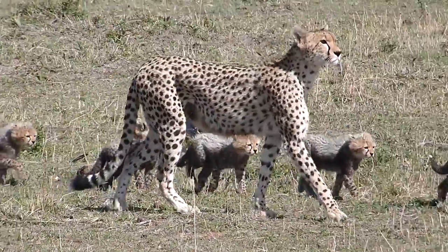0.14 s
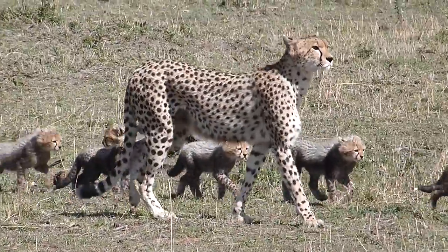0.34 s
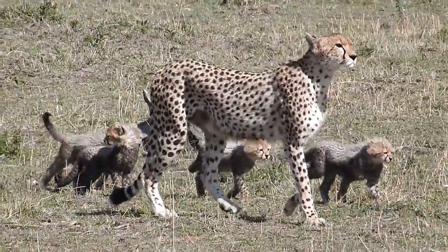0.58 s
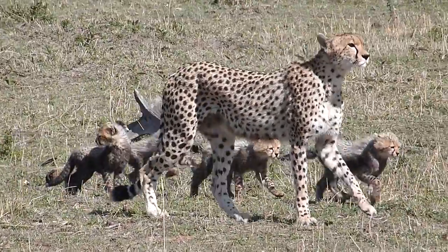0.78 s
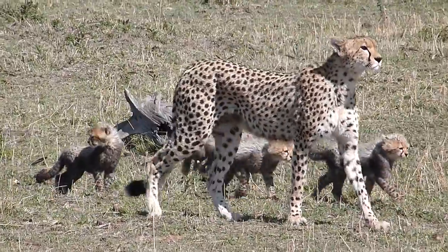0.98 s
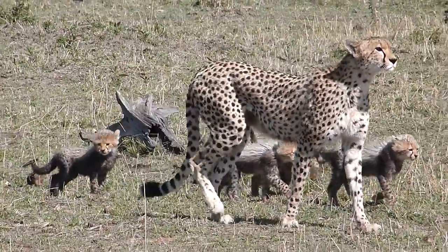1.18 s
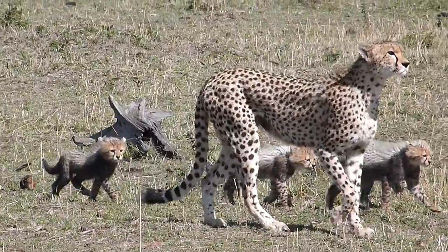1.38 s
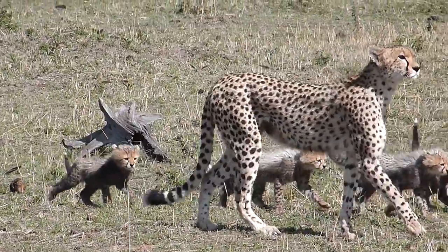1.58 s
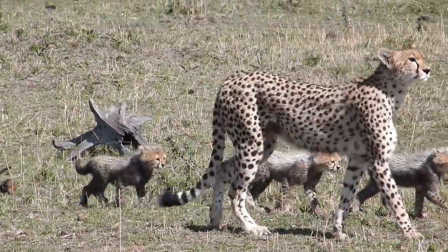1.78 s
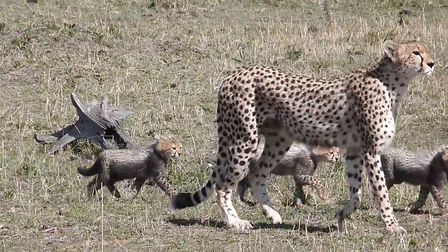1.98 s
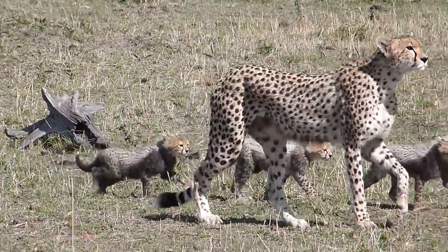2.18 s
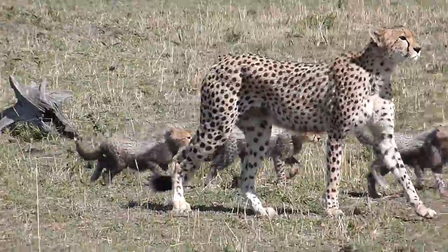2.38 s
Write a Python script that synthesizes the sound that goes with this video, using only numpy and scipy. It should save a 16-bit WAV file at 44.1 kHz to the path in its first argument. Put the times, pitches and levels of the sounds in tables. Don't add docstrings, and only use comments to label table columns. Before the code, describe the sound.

Three separate camera shutter clacks, each a quick rattling cluster with a short motor whirr: near, farther, near. Behind them lie quiet wind rumble, soft grass hiss, tiny ticks and a faint bird, outdoors in stereo.

```python
import sys
import numpy as np
from scipy import signal
from scipy.fft import rfft, irfft, next_fast_len
from scipy.io import wavfile
from scipy.ndimage import uniform_filter1d, map_coordinates

SR = 44100
rng = np.random.default_rng(int(sys.argv[2]) if len(sys.argv) > 2 else 0)


def ratio(d):
    e = np.asarray(d, float) / 20
    return 10 ** e


def wav_out(sig):
    wavfile.write(sys.argv[1], SR, np.round(np.clip(np.atleast_2d(sig).T, -1, 1) * 32767).astype(np.int16))


N = 108045

# (time [s], level [dB])
NEAR_SHOTS = [
    (0.2241, 0),
    (1.5995, 0),
]


def unit(x):
    return x / np.sqrt(np.mean(x ** 2) + 1e-20)


def along(points, hz):
    f, value = np.transpose(points)
    return np.interp(np.log(hz + 1), np.log(f + 1), value)


def curve(rows, start=0):
    s, db = np.transpose(rows)
    return np.interp(np.arange(N) / SR - start, s, db, left=-120, right=-120)


def wobble(rate):
    knots = rng.standard_normal(int(N * rate / SR) + 4)
    return map_coordinates(knots, [np.arange(N) * rate / SR])


def filtered(x, response):
    m = next_fast_len(N + SR // 2)
    return irfft(rfft(x, m) * response(np.fft.rfftfreq(m, 1 / SR)), m)[..., :N]


def ringing(x, peaks):
    def response(hz):
        total = 0
        for k, (centre, width, db) in enumerate(peaks):
            resonance = 1j * hz * width / (centre ** 2 - hz ** 2 + 1j * hz * width)
            total = total + (-1) ** k * ratio(db) * resonance
        return total / np.sqrt(np.mean(np.abs(total) ** 2))
    return filtered(x, response)


def rattle():
    own_db, spiky_db = -4, 2
    noise = rng.standard_normal((3, N))
    pair = noise[0] + ratio(own_db) * noise[1:]
    return unit(pair * ratio(spiky_db * wobble(1500) + wobble(350)))


def burst(s, rise_ms, t60_ms):
    ms = (np.arange(N) / SR - s) * 1000
    db = np.where(ms < 0, -40 * (ms / rise_ms) ** 2, -60 * ms / t60_ms)
    return ratio(np.maximum(db, -150))


def placed(x, pan, lead):
    def response(hz):
        left = ratio(along(pan, hz) / 2) * np.exp(0.5j * along(lead, hz))
        return np.array([left, 1 / left])
    return filtered(x, response)


def near_camera():
    # (time after release [s], blade level [dB], body level [dB], rise [ms], t60 [ms])
    contacts = [(-.003, -44.5, -51, 11, 20), (.0016, -15.5, -27.5, 4.3, 21), (.0055, -25, -34.5, 4.7, 32),
                (.012, -28.5, -34, 5.4, 27), (0.0190, -21, -23.5, 6.5, 28), (0.058, -28, -50, 1.6, 60),
                (0.065, -24, -31.5, 10, 66), (0.025, -38, -29, 5, 47), (0.0886, -15, -48, 2.6, 10),
                (0.091, -25, -58, 2, 11), (.0995, -28, -34, 5, 22), (.1046, -18.5, -27, 4.3, 32),
                (0.1243, -21.5, -34, 2.9, 47), (.181, -29.5, -41.5, 5.8, 39), (0.185, -35, -46, 4.5, 33),
                (.193, -51, -35, 2.6, 17)]
    # (time after release [s], level [dB])
    motor_curve = [(.044, -70), (0.0553, -50), (.058, -41), (.095, -27), (.13, -31.5), (.175, -32),
                   (.195, -40.5), (.208, -43.5), (0.223, -64)]
    # (frequency [Hz], width [Hz], level [dB])
    blade_modes = [(3470, 400, -13), (4650, 420, -6), (6280, 3200, -9.5), (8020, 880, -2.5),
                   (9290, 750, -3), (10430, 910, -2.5), (12600, 2200, -11)]
    body_modes = [(789, 610, -7), (1555, 700, -0.5), (2144, 295, 1.5), (2730, 650, -4), (3450, 490, -1),
                  (4370, 1800, -7)]
    frame_modes = [(722, 52, -6.5), (893, 44, -10), (1500, 100, -13)]
    # (time after release [s], level [dB])
    blows = [
        (.0195, -17.5),
        (.064, -17),
        (.1034, -4.5),
        (.1245, -15.5),
    ]
    # (time after release [s], frequency [Hz], level [dB], t60 [ms])
    parts = [(.0005, 3610, -22, 15), (.0005, 8200, -12, 10), (.0003, 9800, -11, 9), (.0005, 6900, -20, 10),
             (.0005, 2220, -30, 18), (.0183, 1480, -24.5, 30), (.0172, 2050, -28.5, 20),
             (.0182, 4510, -22, 14), (.0182, 6480, -18, 12), (.0182, 8300, -26, 12),
             (.0200, 750, -36.5, 40), (.0620, 2020, -33, 30), (.0640, 9870, -22, 18),
             (.0640, 6930, -30, 18), (.0879, 10200, -2.5, 7), (.0879, 9560, -4, 7), (.0877, 7700, -26, 7),
             (.0877, 5910, -19, 8), (.0877, 4610, -33, 12), (.0912, 10800, -11, 9), (.1033, 1470, -23, 44),
             (.1038, 12300, -21, 8), (.0185, 1130, -31, 24), (.0005, 12400, -23, 8), (.0625, 1150, -31, 24),
             (.1035, 9320, -11, 9), (.1035, 8400, -11, 9), (.1035, 11200, -8.5, 9),
             (.1038, 2500, -25.5, 23), (.1038, 5570, -21, 11), (.1235, 9900, -26, 14),
             (.1240, 1474, -32.5, 52)]
    # (frequency [Hz], left leads by [rad])
    pan_points = [(60, 2), (180, -12), (550, -1.5), (1650, -5), (4970, -8), (15000, -2.5)]
    lead_points = [(300, -0.5), (3000, 0.68), (6500, -1.23), (10000, -1.5), (15000, -2.4)]
    near = cycle(NEAR_SHOTS, contacts, motor_curve, blade_modes, body_modes, motor_body_db=-11)
    near = near + gear() + lever()
    near = near + knocks(NEAR_SHOTS, blows, frame_modes) + rings(NEAR_SHOTS, parts)
    return placed(near, pan_points, lead_points)


def far_camera():
    # (time [s], level [dB])
    shots = [
        (1.1783, 0),
    ]
    # (time after release [s], blade level [dB], body level [dB], rise [ms], t60 [ms])
    contacts = [(.002, -35, -43, 8, 31), (0.025, -35.5, -55, 14, 40), (.0495, -33, -41, 5.8, 30),
                (.060, -36, -43, 6.8, 60), (.084, -37, -43, 4, 30.6), (0.087, -27.5, -33, 3, 30),
                (0.093, -28, -32.5, 10, 40), (0.151, -35, -48, 6.6, 60), (0.17, -64, -41.5, 4, 25),
                (0.184, -38, -39.5, 9, 60), (0.206, -44.5, -40, 14, 90)]
    # (time after release [s], level [dB])
    motor_curve = [(-.002, -71), (.004, -48), (.066, -48), (.078, -67), (.11, -52), (.16, -51),
                   (.22, -59.5), (.258, -56), (0.279, -86)]
    # (frequency [Hz], width [Hz], level [dB])
    blade_modes = [(2860, 420, -8), (4810, 410, -4), (6000, 580, -4.5), (8940, 1800, -4), (10200, 340, 1.5),
                   (10800, 700, -5.5), (12700, 3000, -12.5)]
    body_modes = [(690, 410, 0.5), (1400, 170, 3), (1750, 380, -1.5), (3050, 520, -0.5), (3710, 280, -0.5),
                  (5850, 1600, -8.5)]
    frame_modes = [(604, 44, -1), (1157, 57, -6), (3050, 82, -24)]
    # (time after release [s], level [dB])
    blows = [
        (.003, -17),
        (.09, -29),
        (.185, -24),
    ]
    # (time after release [s], frequency [Hz], level [dB], t60 [ms])
    parts = [(.001, 4720, -37, 17), (.001, 8160, -35, 16), (.001, 10000, -38, 16), (.003, 1370, -41, 30),
             (.049, 6340, -35, 28), (0.049, 1750, -38.5, 42), (.089, 3170, -32, 28), (.089, 6260, -33, 28),
             (.091, 1470, -36.5, 43), (.092, 9200, -34, 18), (0.17, 2960, -39, 33), (0.182, 3000, -39, 25),
             (.182, 3670, -41, 30), (.1815, 1156, -35, 40), (.1815, 580, -36, 42), (.004, 606, -38, 50),
             (.186, 3050, -38, 22), (.201, 2740, -43, 28)]
    # (frequency [Hz], left leads by [rad])
    pan_points = [(60, 0.5), (180, 0), (550, 1.5), (1650, 6.5), (4970, 5.5), (15000, 0)]
    lead_points = [(300, -0.5), (3000, 0.73), (6000, 0.9), (9500, 2), (15000, 5)]
    far = cycle(shots, contacts, motor_curve, blade_modes, body_modes, motor_body_db=3.5)
    far = far + knocks(shots, blows, frame_modes) + rings(shots, parts)
    return placed(far, pan_points, lead_points)


def cycle(shots, contacts, motor_curve, blade_modes, body_modes, motor_body_db):
    blades, body = np.zeros(N), np.zeros(N)
    for s, db in shots:
        whirr = ratio(db + curve(motor_curve, s))
        blades = np.hypot(blades, whirr)
        body = np.hypot(body, ratio(motor_body_db) * whirr)
        for after, blade_db, body_db, rise_ms, t60_ms in contacts:
            shape = ratio(db) * burst(s + after, rise_ms, t60_ms)
            blades = np.hypot(blades, ratio(blade_db) * shape)
            body = np.hypot(body, ratio(body_db) * shape)
    return ringing(blades * rattle(), blade_modes) + ringing(body * rattle(), body_modes)


def knocks(shots, blows, frame_modes):
    push = np.zeros(N)
    for s, db in shots:
        for after, blow_db in blows:
            push[round((s + after) * SR)] = ratio(db + blow_db + rng.normal(0, 1))
    return ringing(push, frame_modes)


def rings(shots, parts):
    rise_ms, scatter_db = 1.83, 1.4
    out, t = np.zeros(N + SR), np.arange(SR // 10) / SR
    for s, db in shots:
        for after, hz, part_db, t60_ms in parts:
            scatter, phase = rng.standard_normal(2)
            decay = ratio(db + part_db + scatter_db * scatter - 58000.0 * t / t60_ms)
            onset = 1 - np.exp(-1e3 * t / rise_ms)
            tone = np.sin(2 * np.pi * hz * t + 2 * phase)
            out[round((s + after) * SR):][:len(t)] += 2 * decay * onset * tone
    return out[:N]


def gear():
    whine_hz, sag_hz_per_s, octave_down_db = 1504, 850, -13.5
    # (time after release [s], level [dB])
    whine_curve = [(.1, -80), (0.105, -55), (.116, -52), (.121, -56), (.127, -41), (.17, -43.5),
                   (0.19, -46.5), (0.2, -65)]
    out, t = np.zeros(N), np.arange(N) / SR
    for s, db in NEAR_SHOTS:
        loaded_s = np.clip(t - s - whine_curve[0][0], 0, 0.2)
        hz = whine_hz - sag_hz_per_s * loaded_s + 18 * wobble(90)
        phase = 2 * np.pi * np.cumsum(hz) / SR
        tone = np.sin(phase) + ratio(octave_down_db) * np.sin(phase / 2)
        out += ratio(db + curve(whine_curve, s) + 2.3 * wobble(130)) * tone
    return out


def lever():
    lever_hz, width_hz = 4900, 130
    # (time after release [s], level [dB])
    lever_curve = [(.06, -70), (.072, -38), (.082, -51), (.09, -75), (.185, -51), (.197, -48), (0.215, -57),
                   (0.224, -79)]
    tone = unit(ringing(rattle(), [(lever_hz, width_hz, 0)]))
    return tone * sum(ratio(db + curve(lever_curve, s)) for s, db in NEAR_SHOTS)


def ticks():
    t60_ms, sharpness = 19.5, 1.9
    # (time [s], peak level [dB], left over right [dB], ring [Hz])
    tick_rows = [(0.1203, -43, -2.5, 8350), (0.4918, -52, -9, 6840), (0.57, -47.5, -12, 8200),
                 (0.695, -53, -5, 10700), (0.8131, -45, -3, 7900), (1.489, -38, 5, 4650),
                 (1.846, -46.5, -0.5, 8350), (1.885, -49, -4, 6000), (1.8945, -39.5, -4, 8700),
                 (1.8963, -46, -5, 3570), (2.0594, -53, -1.5, 10500), (2.3894, -47, 7, 5600)]
    out = np.zeros((2, N))
    for s, db, pan, hz in tick_rows:
        gain = ratio(db - 8.0 + np.array([[pan], [-pan]]) / 2)
        push = gain * burst(s + 0.00051, 2.1, t60_ms) * rng.standard_normal((2, N))
        ring = [(hz, hz / sharpness, 0)]
        out += ringing(ringing(push, ring), ring)
    return out


def bird():
    # (time [s], length [s], from [Hz], to [Hz], level [dB])
    whistles = [
        (0.735, 0.041, 3740, 3050, -65),
        (0.78, .02, 4760, 4470, -65),
        (0.833, .03, 4530, 4530, -65.5),
        (0.86, 0.037, 3200, 2730, -62.5),
    ]
    out, t = np.zeros(N), np.arange(N) / SR
    for s, length, from_hz, to_hz, db in whistles:
        u = np.clip((t - s) / length, 0, 1)
        hz = from_hz + (to_hz - from_hz) * u ** 1.4
        tone = np.sin(2 * np.pi * np.cumsum(hz) / SR)
        out += ratio(db + 3 * wobble(150.5)) * np.sin(np.pi * u) * tone
    return out


def grass():
    # (time [s], level [dB])
    swell = [(0.0, -63), (0.33, -54), (0.5, -63), (0.63, -63), (1.15, -64), (1.31, -63.5), (2.25, -61),
             (2.45, -53)]
    # (frequency [Hz], density [dB per Hz])
    colour = [(1290, -29), (2200, -22), (2530, -3), (6870, -4), (7770, -3.5), (10800, -4.5), (15600, -15)]
    return ratio(curve(swell) + 3.5 + 1.46 * wobble(8.98)) * rush(colour, patchy_db=1.1)


def distant_air():
    # (time [s], level [dB])
    swell = [(0, -51.5), (.7, -53.5), (1.3, -51.5), (1.9, -47.5), (2.45, -51.5)]
    # (frequency [Hz], density [dB per Hz])
    colour = [(210, -24), (350, -18), (515, -2.5), (693, 0), (2500, -22), (3250, -70), (5500, -120)]
    return ratio(curve(swell) + 0.81 * wobble(9.06)) * rush(colour, patchy_db=2.0)


def wind():
    # (time [s], level [dB])
    swell = [(0.0, -50.5), (0.44, -52.5), (0.99, -49.5), (1.27, -49), (2.14, -46.5), (2.45, -48.5)]
    # (frequency [Hz], density [dB per Hz])
    colour = [(12, -39), (20, -10.5), (157, 0), (214, -3.5), (257, -3.5), (450, -9.5), (580, -29),
              (990, -120)]
    return ratio(curve(swell) + 2 + 0.1 * wobble(6.5)) * rush(colour, patchy_db=0.5)


def rush(colour, patchy_db):
    # (frequency [Hz], correlation [-1 to 1])
    likeness = [(60, 0.95), (180, 1), (550, 0.91), (1650, 0.25), (4970, -0.25), (15000, -0.16)]
    z = signal.stft(rng.standard_normal((2, N)), nperseg=512)[2]
    patches = uniform_filter1d(rng.standard_normal(z.shape[1:]), 14, 0)
    patches = unit(uniform_filter1d(patches, 5, 1))
    pair = signal.istft(z * ratio(patchy_db * patches), nperseg=512)[1][:, :N]

    def mid_side(hz):
        angle = np.arccos(np.clip(along(likeness, hz), -1, 1)) / 2
        return ratio(along(colour, hz)) * np.array([np.cos(angle), np.sin(angle)])

    mid, side = filtered(pair, mid_side)
    return unit(np.array([mid + side, mid - side]))


def scene():
    cameras = near_camera() + far_camera()
    plain = grass() + distant_air() + wind()
    return cameras + ticks() + bird() + plain


def band_limit(x):
    return signal.sosfilt(signal.butter(12, 16570, fs=SR, output="sos"), x)


def record(dry):
    full_scale, knee = 0.85, 4
    edge_hz, edge_db, top_hz = 15650, -32, 16500
    soft = dry / (1 + np.abs(dry / full_scale) ** knee) ** (1 / knee)
    mix = filtered(soft, lambda hz: (hz < top_hz) * np.where(hz > edge_hz, ratio(edge_db), 1))
    return band_limit(mix)


dry = scene()
out = record(dry)
wav_out(out)
```